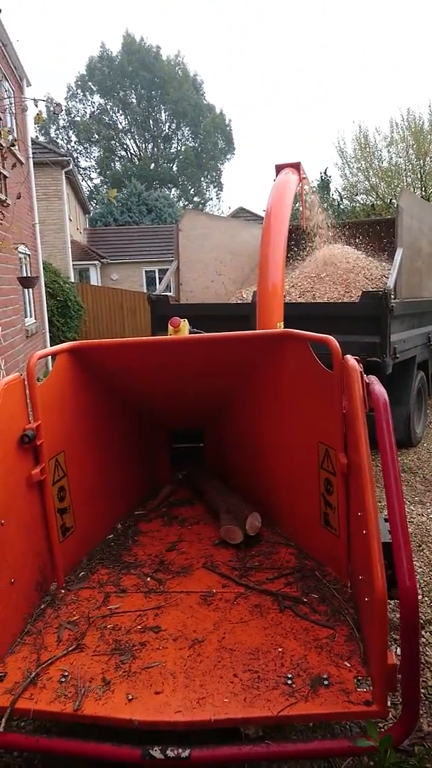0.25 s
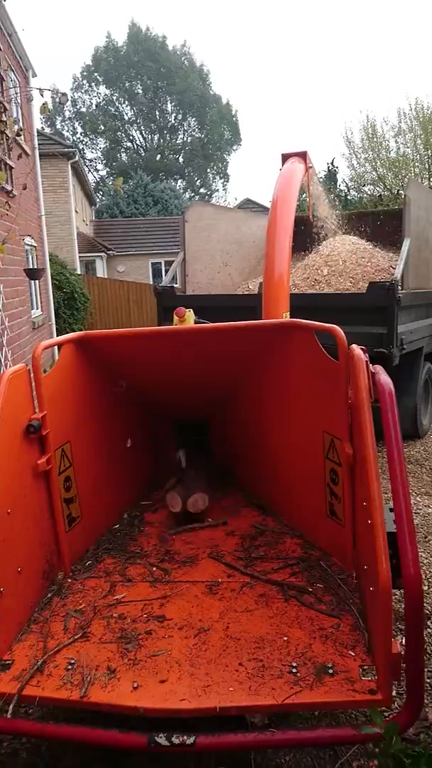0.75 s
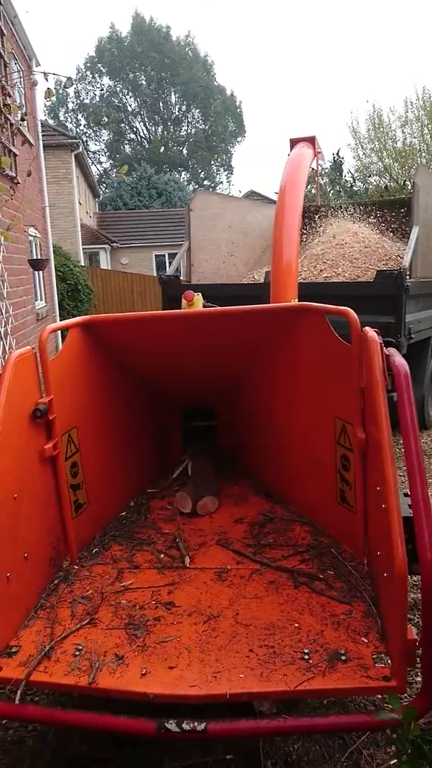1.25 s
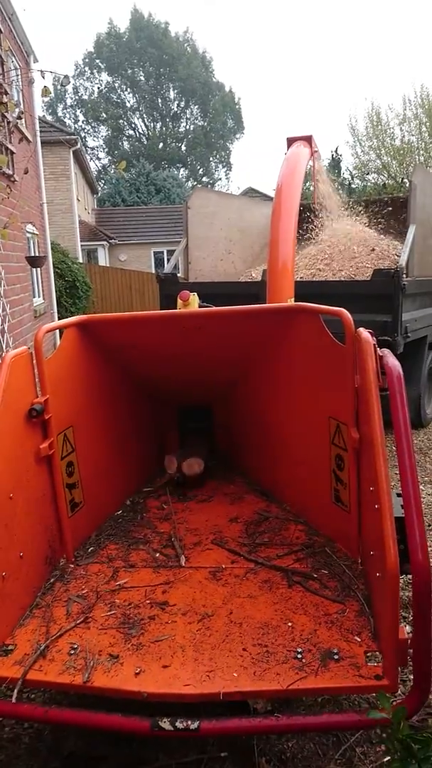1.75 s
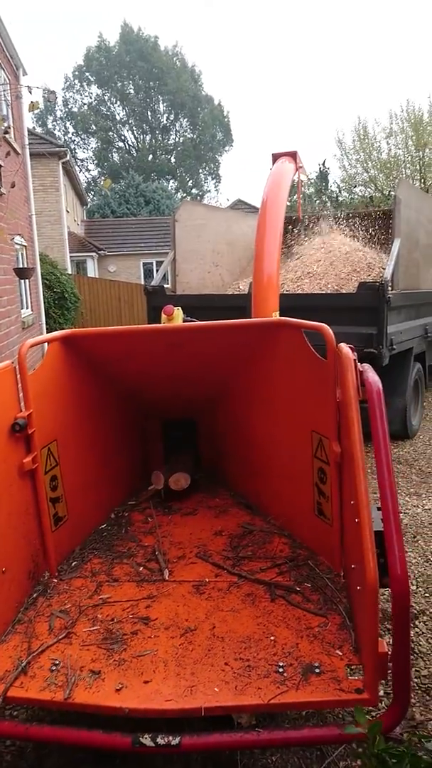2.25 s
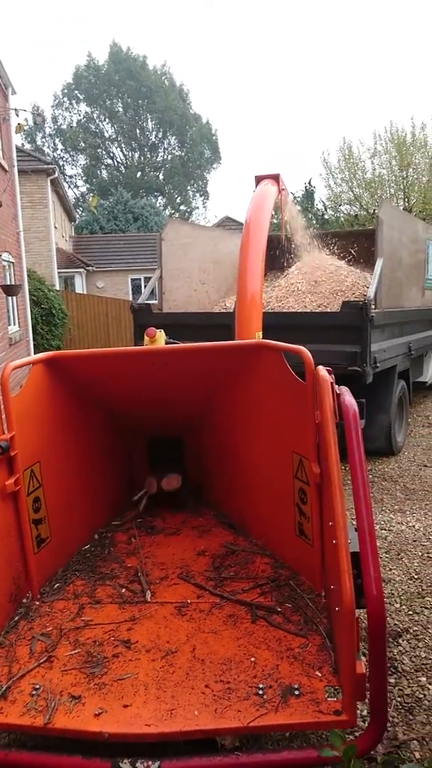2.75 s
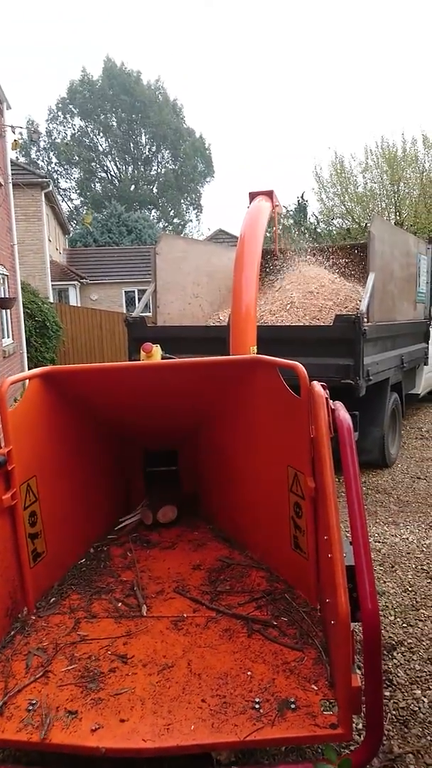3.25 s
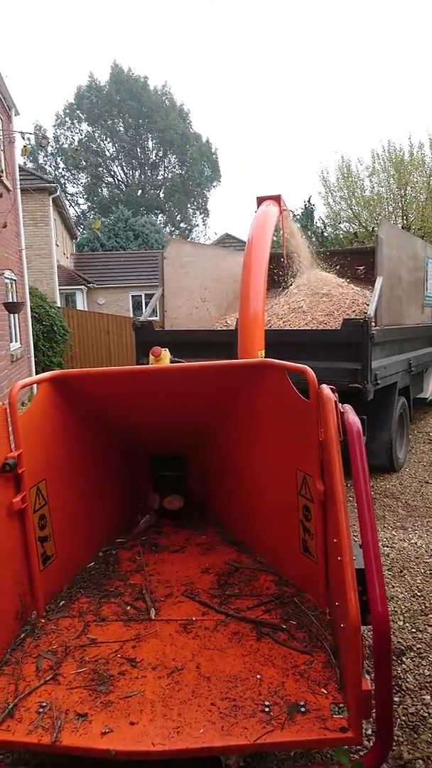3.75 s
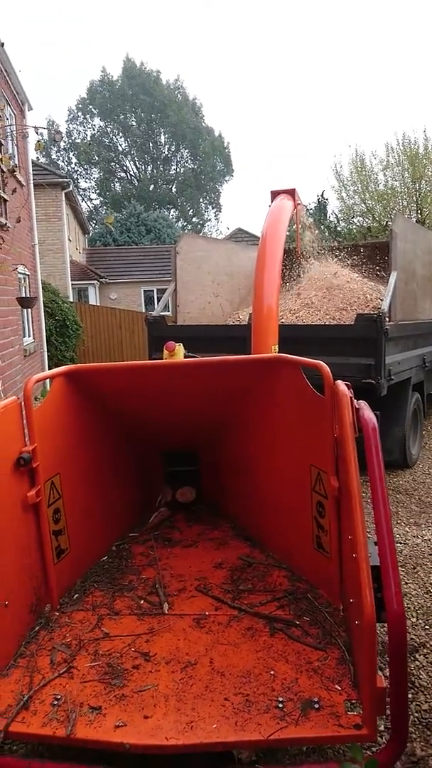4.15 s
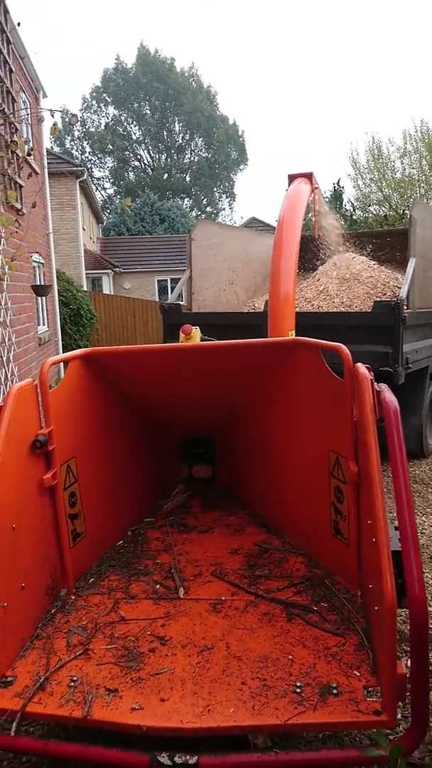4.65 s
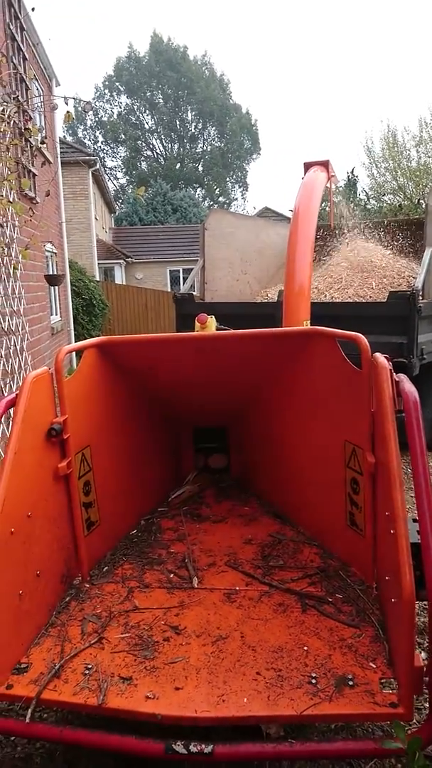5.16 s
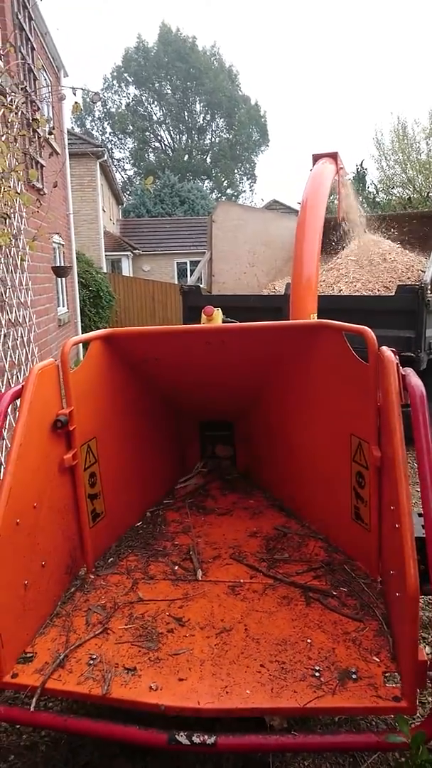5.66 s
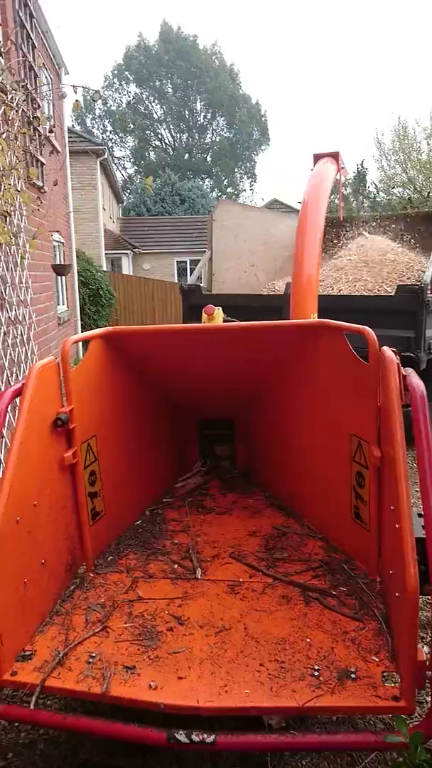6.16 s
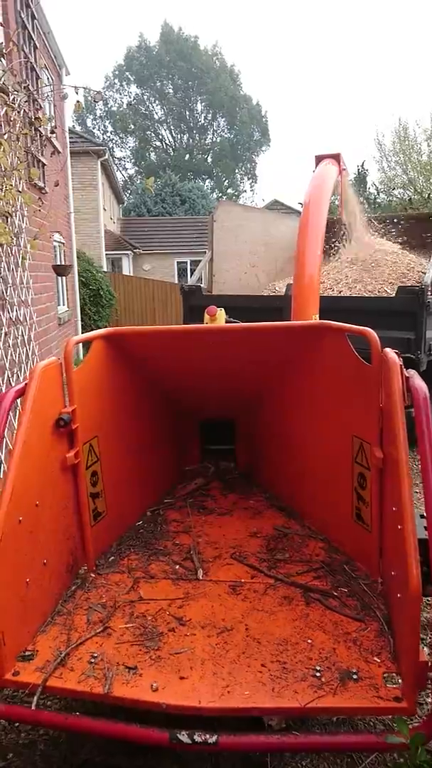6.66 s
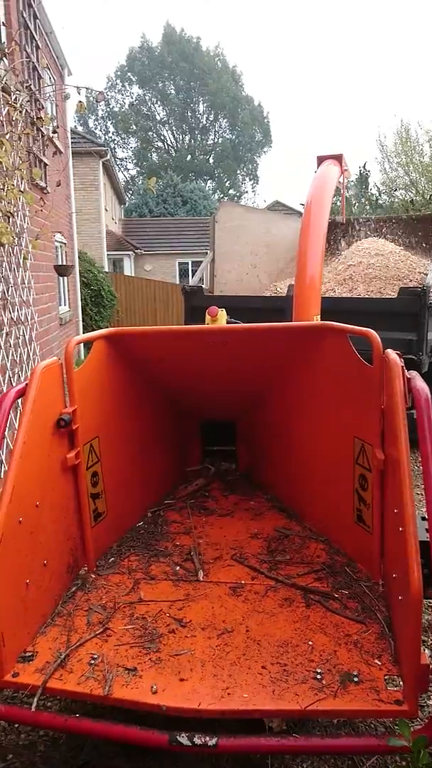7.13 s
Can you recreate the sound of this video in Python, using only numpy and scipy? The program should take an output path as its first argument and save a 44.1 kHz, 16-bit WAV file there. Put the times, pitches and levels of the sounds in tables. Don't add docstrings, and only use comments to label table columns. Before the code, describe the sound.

Close, loud wood chipper: low pulsing hum broken by repeated grinding bites of cracking wood and rattling chips, the pitch sagging and recovering each time.

```python
import sys
import numpy as np
from scipy import signal
from scipy.fft import rfft, irfft
from scipy.io import wavfile
from scipy.ndimage import uniform_filter1d, minimum_filter1d, map_coordinates

SR = 44100
rng = np.random.default_rng(int(sys.argv[2]) if len(sys.argv) > 2 else 0)


def unload_wav(signal):
    wavfile.write(
        sys.argv[1],
        SR,
        np.round(np.clip(np.atleast_2d(signal).T, -1, 1) * 32767).astype(np.int16),
    )


def to_linear_factor(level_db):
    exponent = np.asarray(level_db, float) / 20
    return 10 ** exponent


N = 325943
TIME = np.arange(N) / SR
BINS_HZ = np.maximum(np.arange(N // 2 + 1) * SR / N, 1)

ENGINE_CYCLES_PER_TURN = .9585
START_HZ, RECOVER_S, SAG_S, BELT_S = 26.401, .378, .502, .037
LAST_BITE_S, LAST_BITE_DB = 0.021, -16
RUMBLE_DB, RUMBLE_FEED_DB, SETTLE_S, TONE_DB_PER_HZ = -23, 3.5, 0.057, 0.06
PORT_SHIFT_RAD = .27

# start in seconds, feeding 0 or 1, knife angle in turns,
# first knife's crack in dB, second knife's crack in dB.
STAGES = [(0, 0, .371, 5, 6), (.512, 1, .239, 8, 6), (.89, 0, .289, 7, -3), (1.385, 1, .246, 9, -3),
          (1.91, 0, .372, 6, 1), (2.47, 1, .24, 8, 2), (2.92, 0, .33, 2, -5), (3.44, 1, .24, 8, 1),
          (3.93, 0, .402, 0, 0), (4.41, 1, .242, 7, -2), (4.83, 0, .301, -3, 4), (5.375, 1, .254, 4, -1),
          (5.68, 0, .324, 2, 5), (6.268, 1, .261, 5, 3), (6.56, 0, .243, -1, 8), (6.9, 0, .312, 0, 2)]
STAGE_SPEED_HZ = [29.132, 24.16, 29.692, 24.309, 29.331, 24.11, 29.607, 24.173, 29.938, 23.409, 29.433,
                  22.984, 29.358, 20.0, 28.066, 29.145]
# rattle in dB, housing in dB, paddle tone in dB.
LEVELS = [(-32, -24.5, -13.5), (-22.5, -17.5, -18), (-34, -24, -13), (-23, -18, -18.5), (-34, -21.5, -12.5),
          (-23, -16, -15.5), (-37, -25.5, -13), (-22, -16, -15.5), (-38, -28, -12.5), (-22.5, -16.5, -19),
          (-35.5, -27, -14), (-25.5, -16, -16), (-36, -25, -13.5), (-21, -17.5, -16.5), (-31, -24, -14),
          (-33.5, -22, -13)]
# middle in seconds, half length in seconds, rattle gain in dB,
# housing gain in dB, negative where it thins.
RUSHES = [(.53, 0.044, 6, 7), (0.763, 0.12, 1, -2), (1.435, 0.042, 5, 6.5), (1.845, 0.043, 3.5, 1.5),
          (2.534, 0.11, 4, 2), (2.81, 0.076, 4.5, 2.5), (3.48, 0.12, 2.5, 3), (3.958, 0.042, 10.5, 3),
          (4.686, 0.05, 3.5, 6), (5.213, 0.11, 3, 2.5), (5.467, 0.056, 8, 0), (5.649, 0.022, 9.5, 3.5),
          (6.11, .12, 4, 3.5), (6.457, 0.05, 1, 5), (6.622, 0.095, 5, 5.5), (6.717, 0.033, 3.5, 5),
          (6.933, 0.036, 13, -3), (7.16, 0.11, 5, -0.5), (2.47, 0.027, 1, -13), (3.446, 0.016, -10, -0.5),
          (4.408, 0.014, -6, -5), (5.403, 0.021, -5, -17), (6.28, 0.022, -6.5, 5), (2.92, 0.042, 1.5, 6),
          (3.89, 0.047, -6, -4.5), (5.668, 0.023, -3, -12), (0.878, 0.031, 1.5, 7)]
# start in seconds, end in seconds, pitch in Hz, peak in dB.
WHINES = [
    (6.995, 7.03, 2700, -35),
    (7.248, 7.39, 2430, -34),
]
# multiple of the engine cycle, level in dB rms.
FIRING = [(2, -29.5), (3, -29.5), (4, -51), (5, -38), (6, -35.5), (7, -41), (8, -37)]
# multiple of the disc turn, level in dB.
PADDLES = [(2, -24.5), (4, 0), (5, -27), (6, -25), (7, -31), (8, -22.5), (12, -22), (16, -25)]
# multiple of the disc turn, level in dB rms.
CUT = [(2, -56), (6, -27.5), (7, -37.5), (13, -38.5), (14, -49), (16, -29.5), (17, -34.5)]
# frequency in Hz, level in dB per Hz.
RUMBLE = [(35, -60), (60, -22), (95, -4.5), (135, -12), (160, -4.5), (220, -9.5), (270, -15), (310, -26.5),
          (600, -120)]
# frequency in Hz, level in dB per Hz.
FEED_BODY = [(160, -23), (280, -29), (291, -10), (335, 0), (404, -4), (443, -3), (522, -1.5), (1200, -7),
             (1800, -18), (2340, -24), (3960, -120)]
# frequency in Hz, level in dB per Hz.
WAIT_BODY = [(160, -57), (280, -26), (327, -2.5), (394, -11.5), (433, -6.5), (551, -11), (753, -15),
             (966, -13.5), (1800, -24.5), (2340, -24), (3960, -120)]
# pitch in Hz, first knife's peak in dB, second knife's
# peak in dB, both over the housing.
LOG_KNOCKS = [(1000, 12, 3), (1150, 6, 6), (900, 7, 0), (900, 10, 2), (1000, 13, -1), (800, 9, 3),
              (1000, 6, 0), (700, 9, 3), (900, 3, 2), (800, 12, 4), (850, 6, 5), (820, 14, 8),
              (800, 11, 10), (800, 13, 9), (900, 5, 8), (1050, 6, 6)]
# ratio to the knock pitch, width in Hz, level in dB.
FEED_KNOCK = [(0.551, 88, -13), (1, 195, 0), (1.45, 300, -38), (4.4, 600, -21.5)]
# ratio to the knock pitch, width in Hz, level in dB.
WAIT_KNOCK = [(.95, 240, 0), (1.25, 240, -6), (2.73, 220, -7)]
# time in seconds, peak in dB, pitch in Hz.
THUDS = [(0.514, -8, 641), (1.641, -9, 711), (1.677, -7, 848), (1.826, -8, 563), (1.866, -8, 880),
         (2.487, -8, 549), (2.593, -8, 708), (2.63, -9, 455), (2.816, -6, 458), (3.691, -4, 444),
         (3.804, -9, 627), (4.426, -5, 557), (4.461, -5, 447), (4.569, -7, 506), (4.604, -7, 474),
         (4.642, -5, 452), (4.716, -3, 447), (4.755, -4, 842), (4.794, -5, 713), (5.378, -3, 721),
         (5.413, -5, 856), (5.484, -6, 856), (5.558, -7, 727), (5.596, -5, 880), (5.635, -6, 883),
         (6.27, -8, 711), (6.287, -4, 875), (6.322, -3, 447), (6.395, -4, 573), (6.611, -11, 484)]
# time in seconds, peak in dB, ring of the chip in Hz.
BLOWS = [(0.5132, -7, 2680), (0.6953, -8, 6400), (0.7701, -5, 3680), (0.8066, -7, 3290), (1.3882, -9, 6160),
         (1.4232, -6, 3820), (1.4586, -4, 3240), (1.6407, -9, 3350), (1.7539, -7, 4850), (1.8292, -7, 3070),
         (2.3486, -17, 2680), (2.4867, -6, 6110), (2.5222, -5, 2800), (2.5576, -7, 4300), (2.594, -6, 3750),
         (2.7786, -7, 3560), (3.458, -7, 5760), (3.5084, -6, 3030), (3.69, -7, 4080), (3.8043, -7, 4490),
         (4.4248, -7, 5190), (4.4598, -7, 3730), (4.5685, -8, 4030), (5.3777, -16, 5970),
         (5.4136, -10, 5380), (6.2891, -9, 4750), (6.6119, -10, 2850), (6.8823, -11, 2910),
         (6.9187, -12, 4510), (7.1392, -11, 5160)]
# frequency in Hz,
# level in dB per Hz.
RATTLE = [(1000, 1.5), (1700, -3.5), (2110, -4.5), (2700, -1.5), (5100, -1.5), (6780, -1), (7170, -5),
          (8190, -31), (9260, -11), (11100, -4.5), (13300, -14.5), (15200, -15.5), (15900, -30),
          (16400, -56)]
DULL_DB = [2, 0, .6, 0.5, 3, 1.4, 0, 1.5, 1.5, -1.4, -2.5, -4, -0.5, -3.5, -.6, .6]
# frequency in Hz, likeness from 0 to 1.
LIKENESS = [(60, .97), (250, .95), (640, .87), (1410, .6), (3100, .25), (6800, 0)]
# frequency in Hz, level difference in dB.
LEFT_OVER_RIGHT = [(60, 0.5), (110, 0.0), (200, -2.5), (380, -2.0), (700, -2.5), (1290, -3.5), (2380, -6.5),
                   (4400, -4.0), (8120, -8.5), (15000, -9.0)]


def over_hz(rows):
    hz, value = np.transpose(rows)
    return np.interp(np.log(BINS_HZ), np.log(hz), value)


def colour(x, rows, lo_hz, hi_hz):
    spectrum = rfft(x) * to_linear_factor(over_hz(rows))
    band = spectrum[..., (BINS_HZ > lo_hz) & (BINS_HZ < hi_hz)]
    return irfft(spectrum, N) * N / np.sqrt(2 * np.sum(abs(band) ** 2) / len(x))


def decay(x, seconds):
    return signal.lfilter([1], [1, -np.exp(-1 / (seconds * SR))], x)


def lag(x, seconds):
    return x[0] + decay(x - x[0], seconds) * (1 - np.exp(-1 / (seconds * SR)))


def linger(db, seconds):
    power = to_linear_factor(db) ** 2
    return np.sqrt(np.maximum(power, decay(power, seconds) / (seconds * SR)))


def walk(rate):
    k = int(SR / rate)
    steps = np.repeat(rng.standard_normal(N // k + 1), k)
    return 1.57 * uniform_filter1d(uniform_filter1d(steps, k), k)[:N]


def away_from(times):
    marks = np.zeros(N)
    marks[(times * SR).astype(int)] = 1
    return uniform_filter1d(marks, size=500) < 1e-6


def port_noise():
    alike = np.clip(over_hz(LIKENESS), 0, 1)
    mid, side = rfft(rng.standard_normal((2, N)))
    opposite = np.array([[1], [-1]])
    return irfft(np.sqrt(1 + alike) * mid + np.sqrt(1 - alike) * side * opposite, N)


def per_turn(turns, lasts):
    pattern = rng.standard_normal((int(turns[-1] / lasts) + 2, 1600))
    return map_coordinates(pattern, [turns / lasts, turns % 1 * 1599], order=1) * 1.5


def tones(rows, turns, wobble_db, wobble_turns):
    out = np.zeros(N)
    for multiple, db in rows:
        level = to_linear_factor(db + wobble_db * walk(9)) * np.sqrt(2)
        out += level * np.cos(2 * np.pi * (multiple * turns + wobble_turns * walk(7)))
    return out


def disc_speed(stage):
    hz, now = np.empty(N), START_HZ
    for k, goal in enumerate(STAGE_SPEED_HZ):
        here = stage == k
        start_s, is_feeding = STAGES[k][:2]
        slowness_s = SAG_S if is_feeding else RECOVER_S
        hz[here] = goal + (now - goal) * np.exp(-(TIME[here] - start_s) / slowness_s)
        now = hz[here][-1]
    return lag(hz, BELT_S)


def levels(hz, feeding, stage):
    rattle_db, housing_db, tone_db = np.transpose(LEVELS)[:, stage]
    left_s = np.append(np.transpose(STAGES)[0, 1:], np.inf)[stage] - TIME
    thinning = LAST_BITE_DB * feeding * np.exp(-left_s / LAST_BITE_S)
    rush = sum(np.outer(db, np.clip(1 - abs(TIME - s) / half, 0, 1)) for s, half, *db in RUSHES)
    tone_db = lag(tone_db, SETTLE_S) + TONE_DB_PER_HZ * (hz - 27.3)
    tone_db = tone_db - 9 * np.exp(-TIME / 0.03)
    rumble_db = RUMBLE_DB + RUMBLE_FEED_DB * lag(feeding, SETTLE_S)
    return rattle_db + thinning + rush[0], housing_db + thinning + rush[1], tone_db, rumble_db


def whines():
    out = np.zeros(N)
    for start, end, hz, db in WHINES:
        fade = np.clip(np.minimum(TIME - start, end + 0.016 - TIME) / 0.0064, 0, 1)
        out += to_linear_factor(db) * fade * np.sin(2 * np.pi * hz * TIME)
    return out


def air_rumble(turns, rumble_db):
    air = .65 * port_noise() + .6 * per_turn(turns, 5.)
    return to_linear_factor(rumble_db - 1.5) * colour(air, RUMBLE, 100, 280)


def engine(turns):
    return tones(FIRING, ENGINE_CYCLES_PER_TURN * turns, 1.9, 0.013)


def fan(turns, tone_db):
    return to_linear_factor(tone_db) * tones(PADDLES, turns - .082, .8, 0.008)


def cut_hum(turns, feeding):
    return feeding * tones(CUT, turns, 3.7, 0.1)


def knives(turns, hz, stage):
    angle, *crack_db = np.transpose(STAGES)[2:, stage]
    thud_db = np.transpose(LOG_KNOCKS)[1:, stage]
    passes = np.floor(2 * (turns - angle + .055 * (hz - 26)) + 2).astype(int)
    chance = rng.standard_normal((passes.max() + 1, 2))[passes].T
    meets = np.diff(passes, prepend=passes[0]) == 1
    cracks = meets * to_linear_factor(np.choose(passes % 2, crack_db) + 1.5 * chance[0])
    thuds = meets * to_linear_factor(np.choose(passes % 2, thud_db) + .9 * chance[1])
    return cracks, thuds


def big_cracks(cracks, rattle_db):
    s, peak_db, _ = np.transpose(BLOWS)
    at = (s * SR).astype(int)
    out = cracks * away_from(s)
    out[at] = to_linear_factor(peak_db - rattle_db[at] - 6.0)
    return out


def chip_flurry(hits, per_second, spread_db, grain_s, burst_s, burst):
    chips = (rng.random(N) < per_second / SR) * to_linear_factor(spread_db * rng.exponential(size=N))
    stream = np.sqrt(decay(chips ** 2, grain_s))
    shower = decay(decay(hits ** 2, burst_s), .0002) / (.0002 * SR)
    flurry = stream * np.sqrt(1 + burst * shower)
    return flurry / np.sqrt(uniform_filter1d(flurry ** 2, size=4800))


def log_knocks(thuds, stage):
    out, push = np.zeros(N), uniform_filter1d(thuds, size=7)
    for k, (hz, _, _) in enumerate(LOG_KNOCKS):
        here = stage == k
        modes = FEED_KNOCK if STAGES[k][1] else WAIT_KNOCK[:3 if hz > 950 else 2]
        for ratio, width, db in modes:
            pole = np.exp((2j * ratio * hz - width) * np.pi / SR)
            out[here] += to_linear_factor(db) * signal.lfilter([1], [1, -pole], push[here]).imag
    return out


def housing(cracks, thuds, turns, feeding, stage):
    noise = 0.73 * port_noise() + 0.66 * per_turn(turns, 7.)
    clatter = noise * chip_flurry(cracks, 1200., 1.25, 0.0056, 0.0035, 0.069)
    boom = feeding * colour(clatter, FEED_BODY, 300, 1500)
    boom = boom + (1 - feeding) * colour(clatter, WAIT_BODY, 300, 1500)
    return to_linear_factor(-3.5) * boom + log_knocks(thuds, stage)


def big_thuds():
    out, t = np.zeros(N), TIME[:900]
    shape = np.exp(-t / .0028) * (1 - np.exp(-t / .0004))
    for s, db, hz in THUDS:
        partner = .5 * np.sin(2 * np.pi * 1.63 * hz * t) * np.exp(-t / 0.002)
        ring = np.sin(2 * np.pi * hz * t) + partner
        out[int(s * SR):int(s * SR) + 900] += to_linear_factor(db + 3) * ring * shape
    return out


def chip_rings():
    out, t = np.zeros(N), TIME[:900]
    shape = np.exp(-t / .003) * (1 - np.exp(-t / .0005))
    for s, db, hz in BLOWS:
        out[int(s * SR):int(s * SR) + 900] += to_linear_factor(db - 6.5) * np.sin(2 * np.pi * hz * t) * shape
    return out


def splinters(cracks):
    out, t = np.zeros(N + 400), TIME[:400]
    shape = np.exp(-t / .0018) * (1 - np.exp(-t / .0003))
    at = np.flatnonzero(cracks)
    pitches_hz = 1300 * 4.5 ** rng.random(len(at))
    for i, hz in zip(at, pitches_hz):
        out[i:i + 400] += cracks[i] * np.sin(2 * np.pi * hz * t) * shape
    return out[:N]


def chip_colour(x, stage):
    dull = signal.sosfilt(signal.butter(2, 3600, fs=SR, output="sos"), x)
    dull_db = lag(np.array(DULL_DB)[stage], .02) + 1.5 * walk(25)
    return x + (to_linear_factor(dull_db) - 1) * dull


def rattle(cracks, stage):
    clatter = port_noise() * chip_flurry(cracks, 2500., 2.2, .0025, .0035, 1.8)
    return chip_colour(colour(clatter, RATTLE, 2000, 7000), stage)


def scene():
    stage = np.searchsorted(np.transpose(STAGES)[0], TIME, side="right") - 1
    hz = disc_speed(stage)
    turns = np.cumsum(hz) / SR
    feeding = uniform_filter1d(np.transpose(STAGES)[1, stage], size=300)
    rattle_db, housing_db, tone_db, rumble_db = levels(hz, feeding, stage)
    cracks, thuds = knives(turns, hz, stage)
    cracks = big_cracks(cracks, rattle_db)
    thuds = thuds * away_from(np.transpose(THUDS)[0])

    machine = fan(turns, tone_db) + engine(turns) + cut_hum(turns, feeding) + whines()
    rumble = air_rumble(turns, rumble_db)
    body = linger(housing_db, 0.023) * housing(cracks, thuds, turns, feeding, stage)
    blows = big_thuds() + chip_rings()
    chips = rattle(cracks, stage) + to_linear_factor(-8.5) * splinters(cracks)
    return machine + rumble + body + blows + linger(rattle_db + 1.72, 0.012) * chips


def roll_off(x):
    return signal.sosfilt(signal.butter(12, 16500, fs=SR, output="sos"), x)


def record(dry):
    tilt = to_linear_factor(over_hz(LEFT_OVER_RIGHT) / 2)
    late = np.exp(-2j * np.pi * BINS_HZ * 2 / SR - 1j * PORT_SHIFT_RAD)
    ports = irfft(rfft(dry) * np.array([tilt * late, 1 / tilt]), N)
    ports = signal.sosfilt(signal.butter(6, 47, "high", fs=SR, output="sos"), ports)
    allowed = np.minimum(1, .97 / (abs(ports).max(axis=0) + 1e-9))
    gain = uniform_filter1d(minimum_filter1d(allowed, size=61), size=60)
    return roll_off(gain * ports)


dry = scene()
out = record(dry)
unload_wav(out)
```